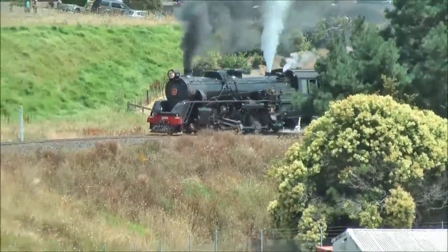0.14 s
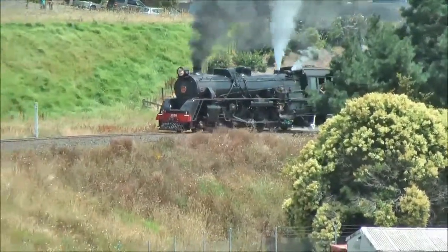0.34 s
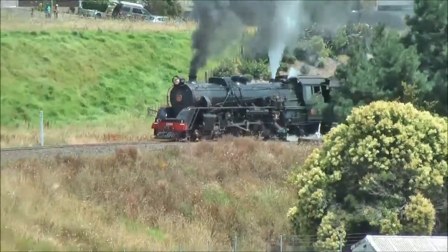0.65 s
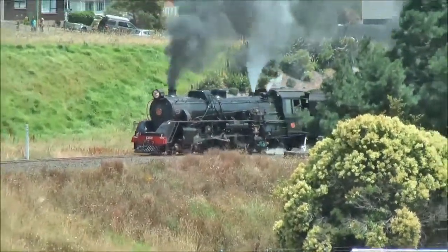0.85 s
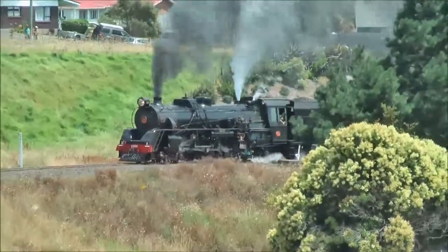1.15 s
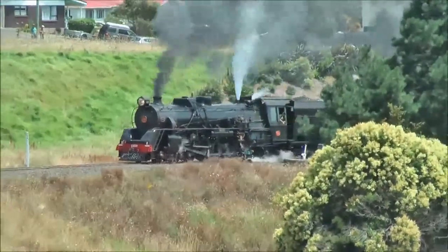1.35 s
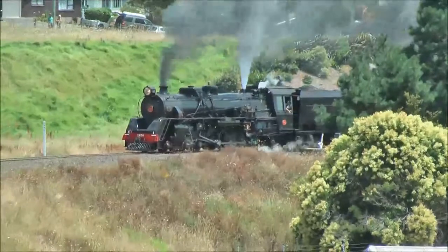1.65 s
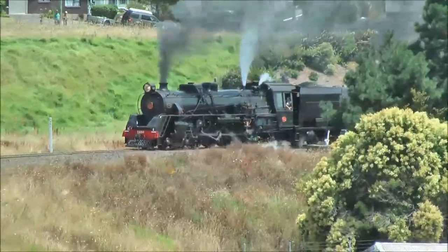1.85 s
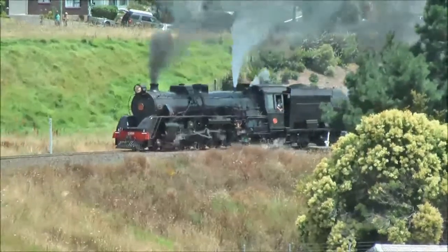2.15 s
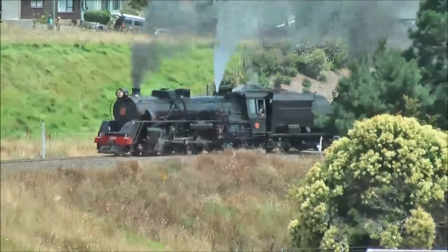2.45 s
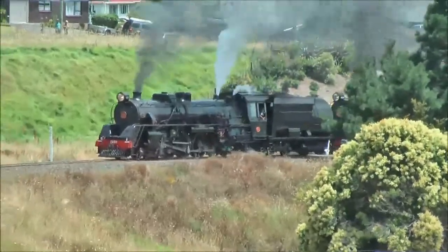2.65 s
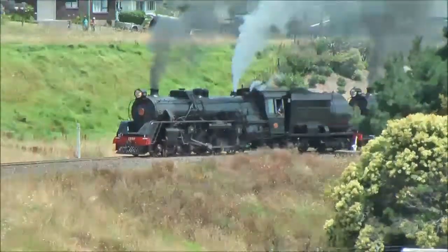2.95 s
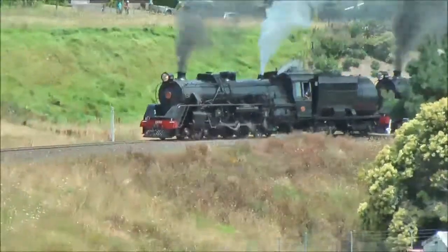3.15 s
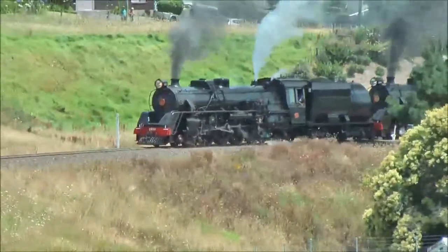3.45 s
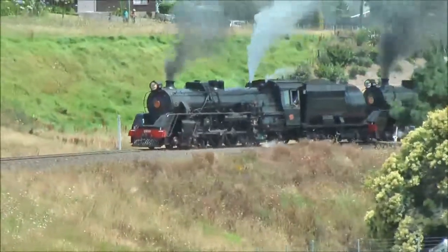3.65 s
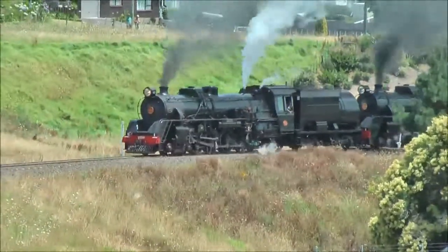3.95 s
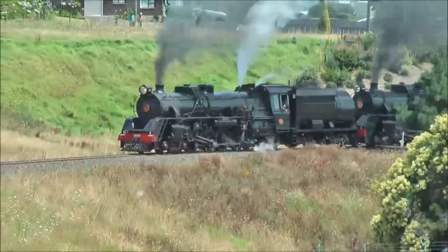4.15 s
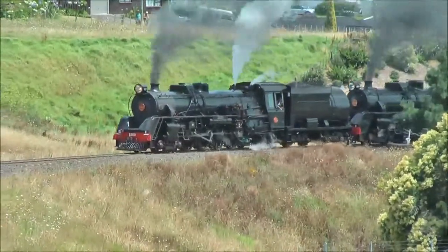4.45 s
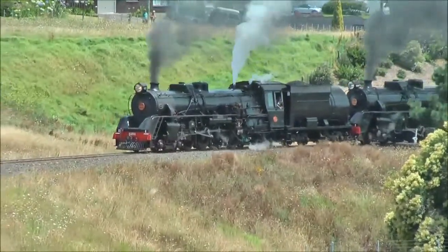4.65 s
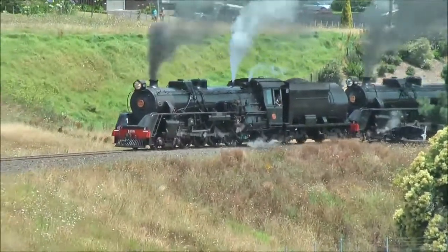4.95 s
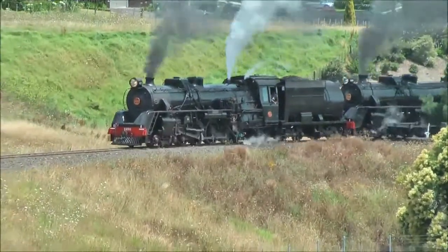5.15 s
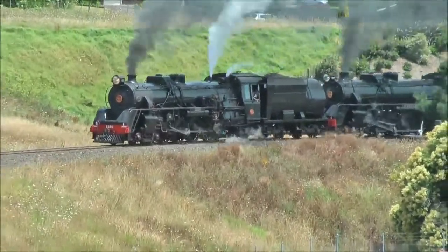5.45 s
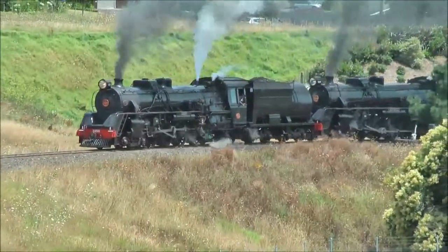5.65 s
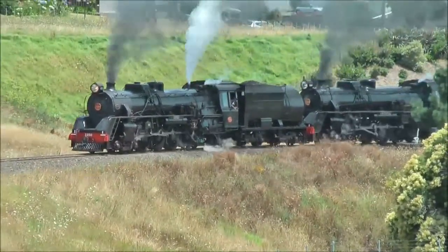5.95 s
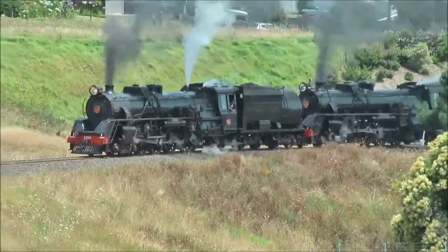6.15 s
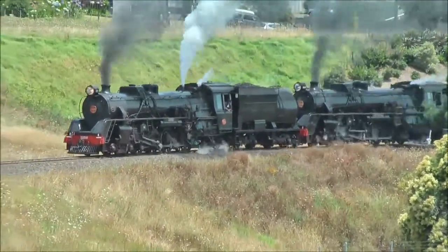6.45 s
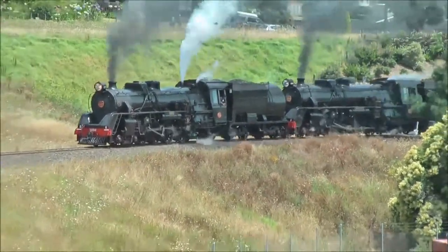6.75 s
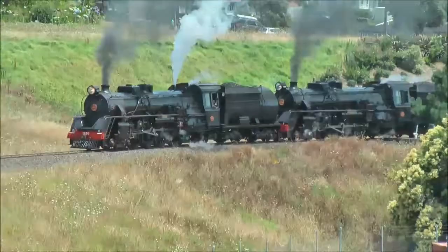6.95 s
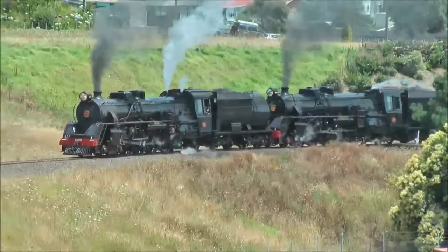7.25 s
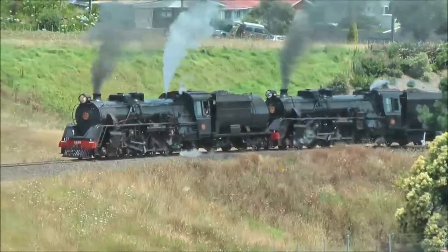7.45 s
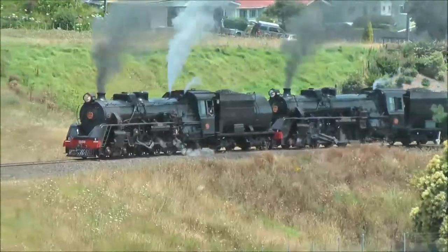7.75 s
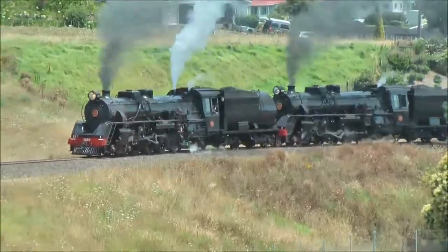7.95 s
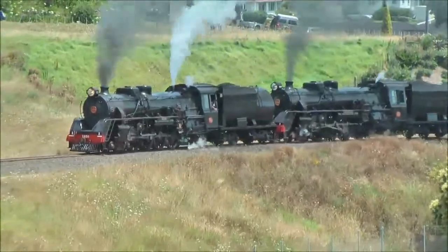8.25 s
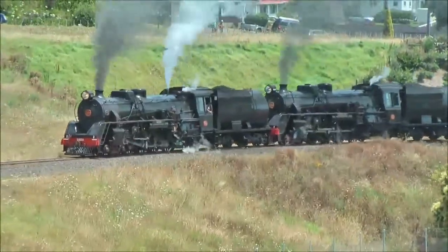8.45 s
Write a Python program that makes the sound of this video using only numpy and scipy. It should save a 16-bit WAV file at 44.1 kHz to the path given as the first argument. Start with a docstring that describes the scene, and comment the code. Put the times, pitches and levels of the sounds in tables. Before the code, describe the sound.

Outdoor microphone in dry grass, buffeted by low wind thumps, strongest in the first second and returning in scattered gusts. Far ahead, hoarse exhaust puffs with a low hollow chimney note beat rapidly and irregularly in strength, becoming bolder as the engines clear the trees. A broad steam hiss wavers and brightens. Thin flange squeaks appear late, with soft steam spurts; a faint high cicada buzz stays close.

```python
"""Two steam locomotives haul a train round a curve across a valley: timed puffs of resonant noise bark
over a low, unsteady chimney note. A lifted safety valve hisses, as banded noise surging on the wind;
low spits of steam are resonant noise, flange squeals a wavering sine, the rolling train coloured noise.
Close by, gust-shaped noise buffets the microphone and a cicada ticks as coloured clicks in dry grass."""
import sys
import numpy as np
from scipy import signal
from scipy.fft import rfft, irfft, next_fast_len
from scipy.io import wavfile
from scipy.ndimage import uniform_filter1d

SR = 44100
rng = np.random.default_rng(int(sys.argv[2]) if len(sys.argv) > 2 else 0)


def digitize_waveform(pressure):
    """Quantize a signal to 16-bit integers and store it at the path in sys.argv[1].

    Rows of a 2-D input are taken as channels; values are limited to [-1, 1].
    """
    field = np.atleast_2d(pressure).T
    bounded = np.clip(field, -1, 1)
    quanta = np.round(bounded * 32767).astype(np.int16)
    wavfile.write(sys.argv[1], SR, quanta)


N = 379701
T = np.arange(N) / SR

# rolling train and countryside, spectrum: (frequency [Hz], relative density [dB per Hz])
ROLLING_SPECTRUM = [(25, -10), (70, 1), (125, -6), (215, 5.5), (300, -10.5), (520, -16), (700, -1.5),
                    (1100, 1.5), (2000, -10), (5000, -13), (9000, -48), (16000, -30)]
# rolling level as the train emerges from behind the trees: (time [s], level [dB])
ROLLING_LEVEL = [(0, -44.5), (1.2, -48.5), (2.4, -40), (3.6, -36.5), (6, -41.5), (8.6, -44)]

# cicada spectrum: (frequency [Hz], relative density [dB per Hz])
CICADA_SPECTRUM = [(5000, -42), (10000, -14), (12100, -22), (12700, -2), (13600, -10), (14200, 3),
                   (14800, -5), (15800, -8.5)]
# clicks of the two tymbals in one cycle: (share of cycle [0..1], relative level [dB])
TYMBAL_CLICKS = [(0, 0), (.267, -.5), (.593, -1), (.793, 0)]
# cicada effort: (time [s], relative level [dB])
CICADA_EFFORT = [(0, -69), (.2, -60), (1.05, -70), (1.6, -61), (2.45, -63), (3.0, -62), (3.6, -55.5),
                 (4.3, -53), (4.7, -59), (5.5, -57.5), (6.7, -55), (7.5, -58.5), (8.0, -55.5), (8.61, -56)]
# moments of harder buzzing: (time [s])
BUZZ_TIMES_S = [1.44, 1.84, 2.14, 2.79, 4.17, 4.81, 5.2, 5.73, 6.1, 6.96]
CICADA_HZ, BUZZ_LENGTH_S, BUZZ_RELATIVE_DB = 26.8, .13, -56

# wind rumble spectrum: (frequency [Hz], relative density [dB per Hz])
RUMBLE_SPECTRUM = [(15, -24), (26, -20), (40, -5), (68, 4.5), (130, 2), (200, -1), (320, -8), (600, -51)]
# wind flutter spectrum: (frequency [Hz], relative density [dB per Hz])
FLUTTER_SPECTRUM = [(80, -11), (200, -9), (330, 2), (480, -1), (650, -6.5), (850, -19.5), (1200, -24),
                    (2200, -33), (6000, -47.5), (12000, -57)]
# breeze between gusts, for rumble and flutter alike: (time [s], relative level [dB])
BREEZE_LEVEL = [(0, -41), (.2, -37), (1.05, -43), (1.28, -50), (1.55, -47), (2.45, -37), (2.62, -58),
                (2.9, -41.5), (3.75, -42), (3.95, -61), (4.2, -40), (5.3, -39.5), (6.6, -46.5), (7.2, -51),
                (8.1, -45.5), (8.61, -41)]
# gusts on the microphone: (time [s], length [s], relative flutter [dB], relative rumble [dB])
GUST_EVENTS = [(0.273, 0.15, -32, -43), (0.472, 0.063, -24, -41), (.7, .12, -25, -39),
               (0.835, 0.046, -22.5, -44), (0.958, 0.12, -20.5, -36), (1.092, .07, -27.5, -49),
               (1.522, 0.1, -31.5, -36), (1.687, .11, -24, -33), (1.837, .14, -33, -43),
               (2.283, .09, -22.5, -31), (2.944, 0.074, -27, -39), (3.09, 0.09, -33, -44),
               (3.27, 0.075, -36, -36.5), (3.55, .16, -39.5, -48), (3.803, 0.084, -40, -44),
               (4.082, 0.12, -36.5, -40), (4.24, 0.043, -34, -34), (4.425, .1, -26, -28),
               (4.547, 0.15, -24, -29), (4.866, 0.15, -30, -34), (5.382, 0.067, -31.5, -33),
               (5.58, .11, -25.5, -31), (5.838, 0.037, -29.5, -39), (6.207, .1, -23.5, -39),
               (6.332, 0.064, -32.5, -39), (6.663, .11, -26.5, -32), (8.564, 0.15, -28, -37)]
# sharp buffets within the gusts: (time [s], length [s], relative level [dB])
BUFFET_EVENTS = [(0.44, .0072, -19), (0.455, 0.0044, -18), (0.507, 0.016, -19.5), (.674, .018, -18.5),
                 (0.714, 0.0061, -19), (.736, .012, -21), (0.869, 0.01, -16.5), (0.917, .014, -19),
                 (.951, .034, -21), (.986, 0.011, -24), (1.014, .016, -26), (1.774, 0.017, -26.5),
                 (1.839, 0.011, -23), (1.88, 0.0077, -23.5), (1.957, .0087, -27), (2.015, 0.016, -27.5),
                 (2.226, 0.009, -19.5), (2.29, .03, -23.5), (3.062, 0.011, -27), (3.277, 0.015, -26),
                 (4.531, 0.026, -18), (4.576, 0.013, -20), (5.534, 0.014, -18), (5.692, 0.0076, -24.5),
                 (5.824, 0.013, -23), (6.231, 0.013, -17.5), (8.544, 0.017, -20)]
GUST_EDGE_EXPONENT = 4.0  # higher: more abrupt start and stop

# flange squeals: (time [s], length [s], pitch [Hz], relative level [dB])
SQUEAL_EVENTS = [(4.86, 0.051, 2818, -29.5), (5.16, 0.012, 2818, -28.5), (5.966, 0.051, 2810, -26),
                 (6.03, 0.059, 2820, -32.5), (6.08, 0.036, 2812, -35), (6.187, 0.037, 2810, -33),
                 (6.323, 0.066, 2812, -29.5), (6.38, .04, 2795, -35), (7.096, 0.019, 2818, -23),
                 (7.14, 0.027, 2822, -18), (7.168, 0.024, 2818, -18.5), (7.22, 0.037, 2793, -19),
                 (7.32, 0.07, 2805, -34.5)]

# bright spits of steam low by the cylinders: (time [s], length [s], level [dB])
SPIT_EVENTS = [(0.64, 0.078, -60), (6.35, .16, -50), (6.6, 0.19, -52), (6.79, 0.24, -46),
               (7.3, 0.15, -56.5), (7.5, 0.2, -55), (7.72, 0.18, -49.5), (8.0, 0.19, -56),
               (8.28, 0.17, -45.5), (8.47, 0.36, -48)]
# spit resonances: (frequency [Hz], width [Hz], relative level [dB])
SPIT_RESONANCES = [(7030, 620, -5), (8000, 500, -16), (9450, 600, -20)]

# valve hiss as the engine emerges from the trees: (time [s], relative level [dB], treble lift [dB])
VALVE_LEVEL = [(0, -35.5, -2), (.15, -42.5, -3), (.55, -41.5, -5), (1.05, -45.5, -10), (1.3, -43, -5),
               (1.6, -38.5, -5.5), (2.4, -43, -6), (2.65, -39.5, 4.5), (3.0, -37.5, 3.5), (3.4, -33.5, 3.5),
               (3.8, -31, 3.5), (4.3, -31.5, 7), (4.62, -34, 6.5), (5.65, -34.5, 5.5), (6.1, -30, 2.5),
               (6.95, -28.5, 5), (7.3, -32, -2.5), (8.1, -32.5, 1.5), (8.61, -28, -3)]
# valve jet spectrum: (frequency [Hz], relative density [dB per Hz])
VALVE_SPECTRUM = [(500, -31), (850, -14.5), (1100, -2.5), (1400, -6.5), (1750, -1), (2600, 2), (3600, 0),
                  (4700, -5), (5100, -11), (5500, -13.5), (6200, -24), (7400, -32), (8600, -40),
                  (12000, -45.5)]
# edges between the hiss bands: (frequency [Hz])
VALVE_EDGES_HZ = [1500, 1950, 2300, 2700, 3100, 3600, 4200, 4900, 5700, 6700]
# hiss surges on the wind: (time [s], length [s], best band [Hz], half-width [octaves], nominal lift [dB])
WIND_SURGES = [(.28, .25, 3350, .36, 16), (0.413, 0.098, 2800, .75, 10.5), (.61, .19, 2650, .26, 12.5),
               (0.798, 0.2, 2000, 0.83, 8), (1.336, .2, 2700, .2, 7), (1.48, 0.22, 2220, 1.1, 7),
               (1.77, 0.38, 2300, 0.65, 3), (2.07, .23, 3150, .42, 11.5), (2.185, .08, 1800, 1.1, 9.5),
               (2.55, .3, 1500, .2, 5), (2.75, .22, 3000, 1.3, 5), (3.2, .16, 3200, .6, 3),
               (3.92, 0.58, 1750, .14, 4), (4.325, 0.19, 2100, 0.46, 4), (4.795, 0.2, 3200, 0.29, 6.5),
               (5.185, .18, 3600, 0.47, 3.5), (6.408, 0.1, 1990, .6, 2.5), (6.677, 0.23, 2700, 0.64, 3),
               (6.897, 0.26, 4260, 0.49, 4), (7.508, 0.13, 4200, 0.63, 4.5), (7.783, 0.17, 3650, 0.41, 5.5),
               (8.006, 0.15, 3400, 0.57, 4.5), (8.297, 0.22, 1960, 0.23, 8.5),
               (8.452, 0.2, 2480, 0.43, 3.5)]
# faint opposite-phase hiss that widens the stereo: (frequency [Hz], relative density [dB per Hz])
SIDE_HISS_SPECTRUM = [(800, 15), (1600, 2), (2500, -24), (4300, -16), (4900, 8), (6700, 10), (7600, -16),
                      (10000, -35)]
BAND_WANDER_DB, BAND_WANDER_PER_S = 1.5, 4.6
SURGE_CONTRAST = .12  # share of a surge's lift that far-off bands lose
SIDE_HISS_RELATIVE_DB = -36.5

# exhaust beats: (time [s], relative bark [dB], relative chimney thump [dB])
CHUFF_EVENTS = [(0.022, -42, -42.5), (0.4, -36, -39.5), (0.755, -41, -39), (1.135, -44, -42),
                (1.463, -35, -35.5), (1.825, -42, -36), (2.149, -34, -30.5), (2.482, -38.5, -41.5),
                (2.819, -26.5, -32), (3.155, -32, -36.5), (3.443, -28, -30), (3.759, -27.5, -34),
                (4.075, -27, -34), (4.366, -26, -34), (4.679, -32.5, -40), (4.972, -31, -39.5),
                (5.265, -28.5, -35.5), (5.582, -31.5, -38), (5.843, -28.5, -34), (6.138, -27.5, -34.5),
                (6.433, -27.5, -32.5), (6.725, -33, -36), (7, -26, -37.5), (7.295, -34, -39),
                (7.536, -32, -39.5), (7.822, -35, -35.5), (8.085, -35.5, -36), (8.381, -36, -37.5)]
# resonances of the blast: (frequency [Hz], width [Hz], relative level [dB])
BARK_RESONANCES = [(650, 43, 1), (825, 62, -7.5), (1091, 99, 3), (1250, 23, -5.5), (1640, 170, 1),
                   (2310, 60, -26)]
# rush of steam in each beat: (frequency [Hz], relative density [dB per Hz])
BLAST_SPECTRUM = [(120, -15), (260, 14.5), (450, -3.5), (800, 1), (1400, 1.5), (2400, 5), (4500, -9),
                  (7000, -55), (12000, -61)]


def undb(db):
    """Decibels to gain."""
    return 10 ** (np.asarray(db) / 20)


def unit(x):
    """Scale to rms 1."""
    return x / np.sqrt(np.mean(x ** 2))


def curves(table):
    """Interpolate each column of a timed table at every sample."""
    time_s, *columns = np.transpose(table)
    return [np.interp(T, time_s, column) for column in columns]


def filtered(x, gain):
    """x through the zero-phase response gain(Hz), at rms 1."""
    size = next_fast_len(N)
    f_hz = np.arange(size // 2 + 1) * SR / size + 1  # +1 avoids log(0)
    return unit(irfft(rfft(x, size) * gain(f_hz), size)[:N])


def coloured(points, x=None):
    """Noise, or x, shaped by (Hz, dB) points on a log-frequency axis."""
    hz, db = np.transpose(points)
    source = rng.standard_normal(N) if x is None else x
    return filtered(source, lambda f_hz: undb(np.interp(np.log(f_hz), np.log(hz), db)))


def resonant(modes):
    """Noise ringing in (Hz, width Hz, dB) resonances with steep skirts."""
    def gain(f_hz):
        return sum(undb(db) / (1 + ((f_hz - hz) / width_hz) ** 2) for hz, width_hz, db in modes)
    return filtered(rng.standard_normal(N), gain)


def split(x, edges_hz):
    """Adjoining bands that add up to x."""
    lows = [signal.sosfiltfilt(signal.butter(3, hz, fs=SR, output="sos"), x) for hz in edges_hz]
    return np.diff([0 * x, *lows, x], axis=0)


def walk(rate_per_s):
    """Smooth random signal at rms 1, changing about rate_per_s times a second."""
    k = max(int(SR / rate_per_s), 2)
    held = np.repeat(rng.standard_normal(N // k + 2), k)[rng.integers(k):][:N]
    return unit(uniform_filter1d(uniform_filter1d(held, k), k))


def even(x, window_s):
    """x with its chance swells levelled out, near rms 1."""
    return x / np.sqrt(uniform_filter1d(x ** 2, int(window_s * SR)))


def around(time_s, length_s):
    """Slice of samples within two lengths of a time."""
    return slice(*np.searchsorted(T, [time_s - 2 * length_s, time_s + 2 * length_s]))


def bursts(rows):
    """Envelope of bell-shaped (s, length s, dB) bursts, summed in power."""
    power = np.zeros(N)
    for time_s, length_s, db in rows:
        near = around(time_s, length_s)
        power[near] += undb(db) ** 2 * np.exp(-(2 * (T[near] - time_s) / length_s) ** 2)
    return np.sqrt(power)


def swells(times_s, levels_db, rise_s, fall_s):
    """Envelope of puffs that swell to a peak at each time and die away."""
    power = np.zeros(N)
    for time_s, db in zip(times_s, levels_db):
        near = np.abs(T - time_s) < .5
        age_s = T[near] - time_s
        rise = np.exp(-(age_s / rise_s) ** 2)
        fall = np.exp(1 - np.hypot(1, age_s / fall_s))
        power[near] += (undb(db) * np.where(age_s < 0, rise, fall)) ** 2
    return np.sqrt(power)


def rolling():
    """Rolling train and countryside: broadband noise, level set by emergence and a slow wander."""
    level_db, = curves(ROLLING_LEVEL)
    return coloured(ROLLING_SPECTRUM) * undb(level_db + 0.92 * walk(6.6))


def insects():
    """A cicada snaps its tymbals in a limping cycle, slightly right, over a thin chorus further off."""
    cycles = np.cumsum(CICADA_HZ + 0.13 * walk(2)) / SR
    snaps = np.zeros(N)
    for share, db in TYMBAL_CLICKS:
        count = np.floor(cycles - share)
        snaps += undb(db) * np.diff(count, append=count[-1])
    ticking = coloured(CICADA_SPECTRUM, snaps * undb(1.4 * walk(100)))
    near = ticking + coloured(CICADA_SPECTRUM) * undb(-3.5)
    chorus = undb(-20) * coloured(CICADA_SPECTRUM) * np.array([[1], [-1]])  # opposite in the two channels
    effort_db, = curves(CICADA_EFFORT)
    buzz = bursts((time_s, BUZZ_LENGTH_S, BUZZ_RELATIVE_DB) for time_s in BUZZ_TIMES_S)
    effort = np.hypot(undb(effort_db), buzz) * undb(1.3 * walk(16))
    return effort * (near * undb([[-.4], [.4]]) + chorus)


def gusts():
    """Strength of rumble and flutter: flat-topped gusts over the breeze, summed in power."""
    breeze_db, = curves(BREEZE_LEVEL)
    rumble, flutter = undb(breeze_db) ** 2, undb(breeze_db) ** 2
    for time_s, length_s, flutter_db, rumble_db in GUST_EVENTS:
        near = around(time_s, length_s)
        shape = np.exp(-np.abs(2 * (T[near] - time_s) / length_s) ** GUST_EDGE_EXPONENT)
        rumble[near] += shape * undb(rumble_db) ** 2
        flutter[near] += shape * undb(flutter_db) ** 2
    return np.sqrt(rumble), np.sqrt(flutter)


def wind():
    """Eddies rumble over the case and flutter in the ports; only small eddies differ between ports."""
    large_eddies, small_eddies = gusts()
    gusting = small_eddies * undb(-1.0) * unit(undb(4.3 * walk(110)))
    strength = np.hypot(gusting, bursts(BUFFET_EVENTS))
    flutter = even(coloured(FLUTTER_SPECTRUM), 0.0117) * strength
    # the briefest buffets are the smallest eddies and flap higher
    brief = [(time_s, length_s / 2, db) for time_s, length_s, db in BUFFET_EVENTS if length_s < .0165]
    flap = even(resonant([(745, 340, 0)]), 0.0056) * bursts(brief) * undb(-6.5)
    rumble = even(coloured(RUMBLE_SPECTRUM), 0.15) * large_eddies
    rumble = rumble * undb(-1.0) * unit(undb(2.1 * walk(30)))
    port_noise = coloured([(40, -21), (130, -5.5), (300, -0.5), (480, -3.5), (700, -6), (1100, -13.0),
                           (2000, -27.5), (6000, -57.5)])
    port_difference = port_noise * strength * undb(-16.5) * np.array([[1], [-1]])
    return flutter + flap + rumble + port_difference


def flange():
    """A wheel rubs the curved rail and sings in one mode, in short unsteady bursts."""
    time_s, length_s, hz, db = np.transpose(SQUEAL_EVENTS)
    pitch_hz = np.interp(T, time_s, hz) + 4 * walk(60)
    chatter = undb(.9 * walk(110))
    # the wheel keeps ringing faintly between bursts
    ringing = undb(-45.0) * np.interp(T, [4.4, 4.8, 7.2, 7.5], [0, 1, 1, 0])
    grip = bursts(zip(time_s, length_s, db)) + ringing
    return np.sqrt(2) * np.sin(2 * np.pi * np.cumsum(pitch_hz) / SR) * grip * chatter


def spits():
    """Steam spitting low by the cylinders: bursts of bright resonant noise."""
    return resonant(SPIT_RESONANCES) * bursts(SPIT_EVENTS)


def across_valley(x, path_db, drift_s):
    """Paths over ground and through moving air come and go: a comb of notches swirls in the sound."""
    lags_s = [.0008, .0012, .0017, .0024, .0033, .0052]
    late = sum(walk(7) * np.interp(T - lag_s - drift_s * walk(3), T, x) for lag_s in lags_s)
    return even(x + undb(path_db) * late, .08)


def safety_valve():
    """A steady jet; moving air on the long path brings it over in surges, each favouring one band."""
    level_db, treble_db = curves(VALVE_LEVEL)
    jet = across_valley(coloured(VALVE_SPECTRUM), path_db=-15, drift_s=.0002)
    edges_hz = np.array([900, *VALVE_EDGES_HZ, 9000])
    centres_hz = np.sqrt(edges_hz[1:] * edges_hz[:-1])
    times_s, lengths_s, best_hz, octaves, lift_db = np.transpose(WIND_SURGES)
    surges = np.array([bursts([(time_s, length_s, 0)]) ** 2
                       for time_s, length_s in zip(times_s, lengths_s)])
    hiss = 0
    for band, hz in zip(split(jet, VALVE_EDGES_HZ), centres_hz):
        treble_share = np.interp(hz, [3800, 5300, 6200, 8000], [0, .9, 1, .3])
        # the lowest band bends round obstacles and fades least
        bent_db = (hz < 1500) * 0.16 * (np.mean(level_db) - level_db)
        favour = np.exp(-(np.log2(hz / best_hz) / octaves) ** 2 / 2)
        surge_db = (lift_db * ((1 + SURGE_CONTRAST) * favour - SURGE_CONTRAST)) @ surges
        wander_db = BAND_WANDER_DB * walk(BAND_WANDER_PER_S)
        flicker_db = .7 * walk(25)
        band_db = level_db + 4.0 + treble_share * treble_db + bent_db + surge_db + wander_db + flicker_db
        hiss = hiss + band * undb(band_db)
    side_hiss = coloured(SIDE_HISS_SPECTRUM) * undb(level_db + SIDE_HISS_RELATIVE_DB)
    return hiss * undb(0.81 * walk(12)) + side_hiss * np.array([[1], [-1]])


def exhaust():
    """Steam releases bark from the chimney, each differing; the smokebox's low ring lags and lingers."""
    time_s, bark_db, thump_db = np.transpose(CHUFF_EVENTS)
    bark = resonant(BARK_RESONANCES) * undb(0.5) + coloured(BLAST_SPECTRUM) * undb(-4.0)
    bark = sum(band * undb(1.2 * walk(9)) for band in split(bark, [500, 900, 1400, 2200]))
    bark_puffs = swells(time_s, bark_db, rise_s=.04, fall_s=.033)
    bark = bark * bark_puffs * undb(1.6 * walk(120))
    # turbulence rings the note, so pitch and strength are unsteady
    pitch_hz = 213 + 9 * walk(30)
    note = np.sin(2 * np.pi * np.cumsum(pitch_hz) / SR) * undb(2.2 * walk(45))
    ring = even(resonant([(175, 9.5, -9.5), (228, 40, 5), (282, 28, -21)]), 0.081)
    thump = note * undb(5.0) + ring * undb(2.5)
    thump_puffs = swells(time_s + 0.014, thump_db, rise_s=0.05, fall_s=0.041)
    return bark + thump * thump_puffs


def scene():
    """The far train is a point ahead, bar a faint hiss opposite in the two channels; the rest is near."""
    train = rolling() + flange() + spits() + safety_valve() + exhaust()
    return insects() + wind() + train


def record(dry):
    """Strong low sound turns everything down for a moment; a steep low-pass cuts the top."""
    low = split(dry.mean(axis=0), [900])[0]
    keep = np.exp(-1 / (0.014 * SR))  # 14 ms power smoothing
    power = signal.lfilter([1 - keep], [1, -keep], low ** 2)
    gain = (1 + power / undb(-24.5) ** 2) ** -.4
    low_pass = signal.ellip(10, .2, 70, 15850, fs=SR, output="sos")
    return signal.sosfilt(low_pass, dry * gain)


dry = scene()
out = record(dry)
digitize_waveform(out)
```